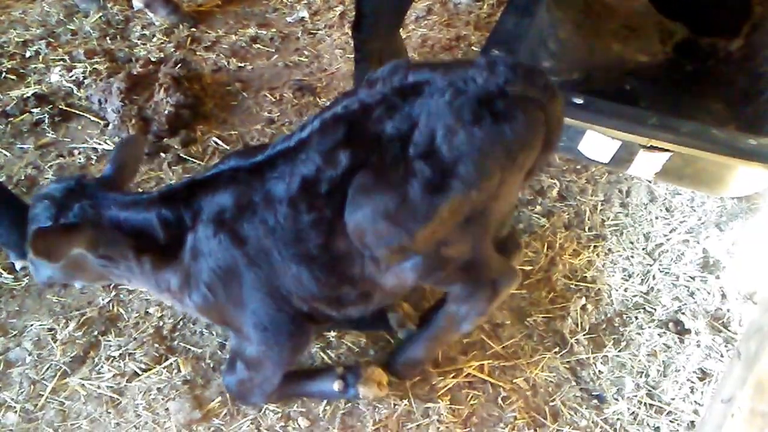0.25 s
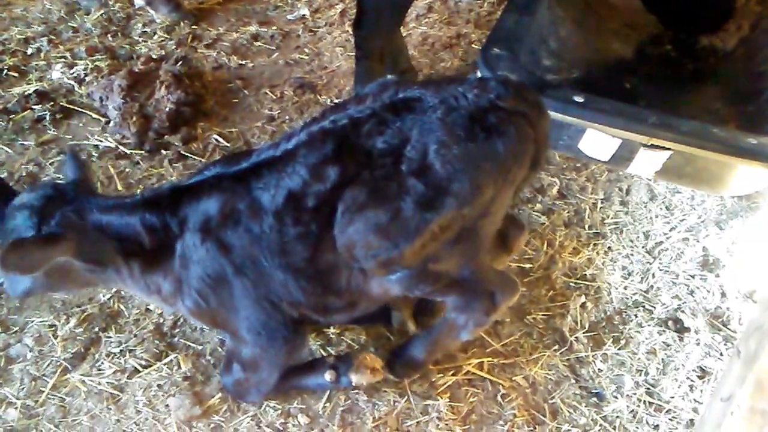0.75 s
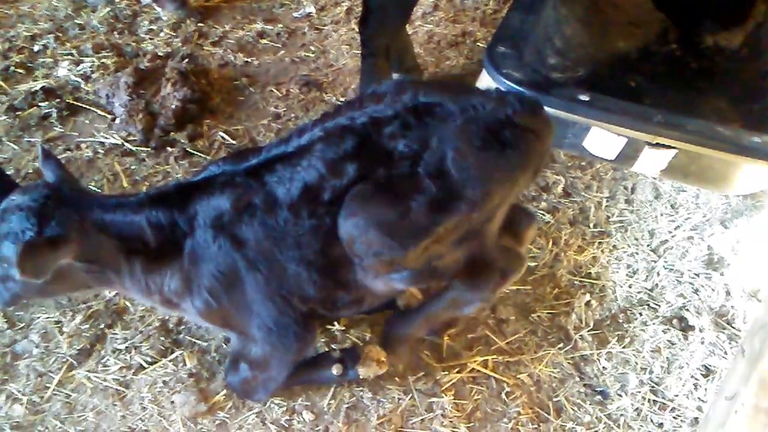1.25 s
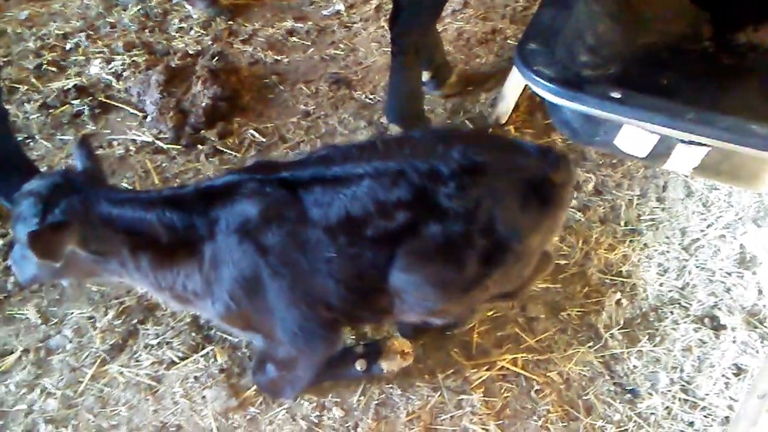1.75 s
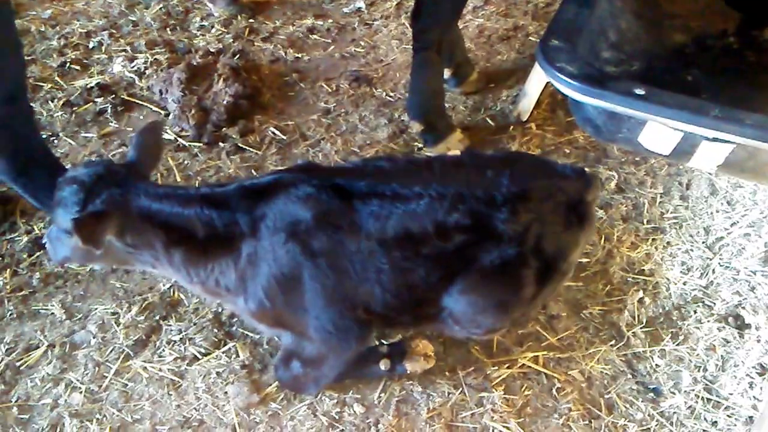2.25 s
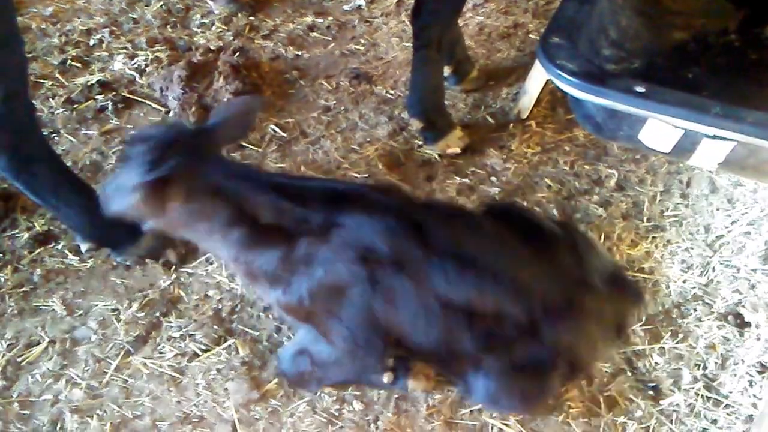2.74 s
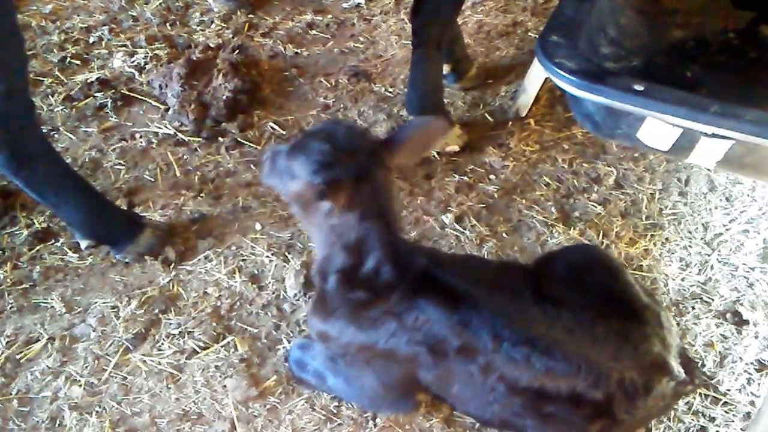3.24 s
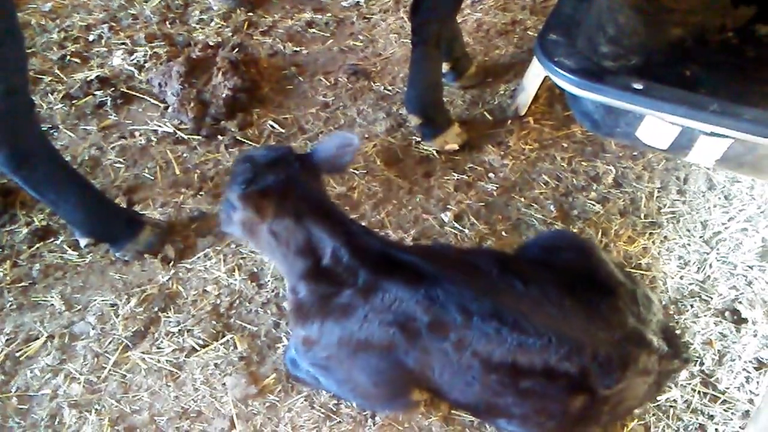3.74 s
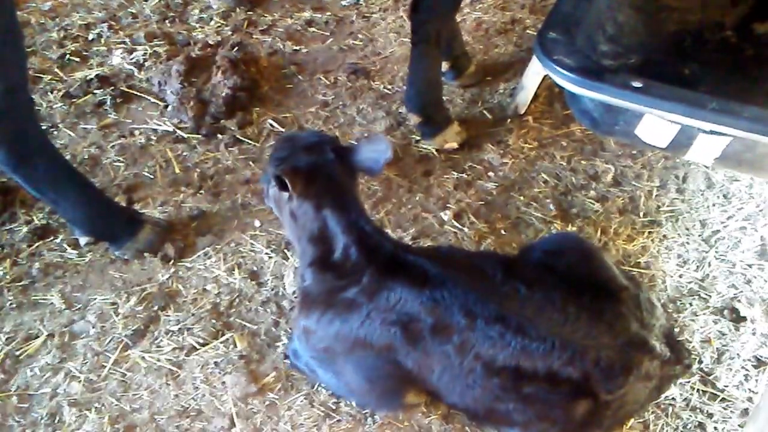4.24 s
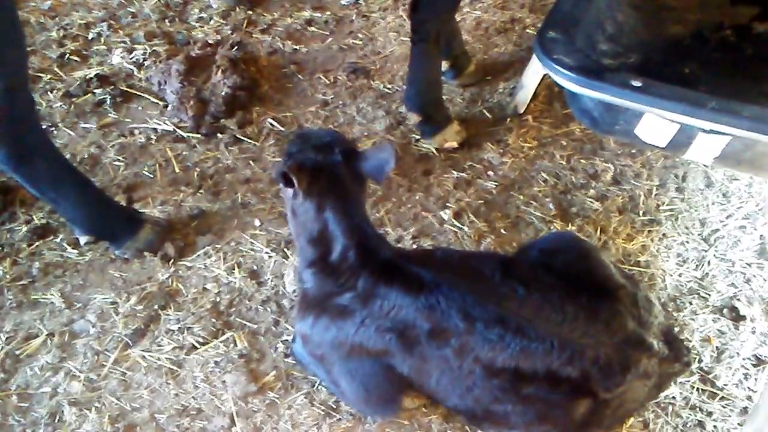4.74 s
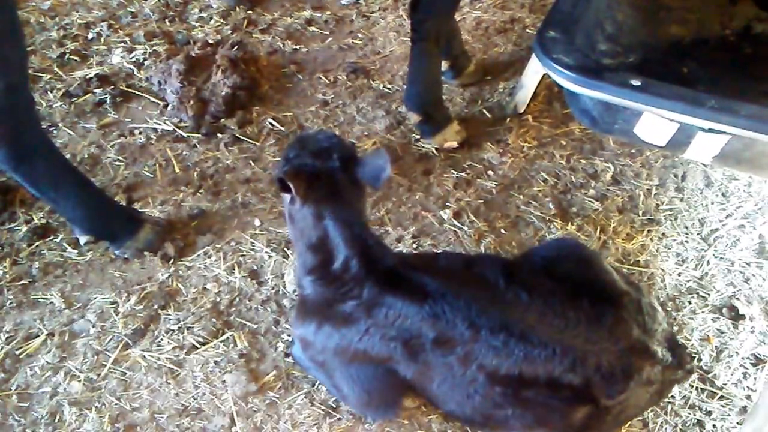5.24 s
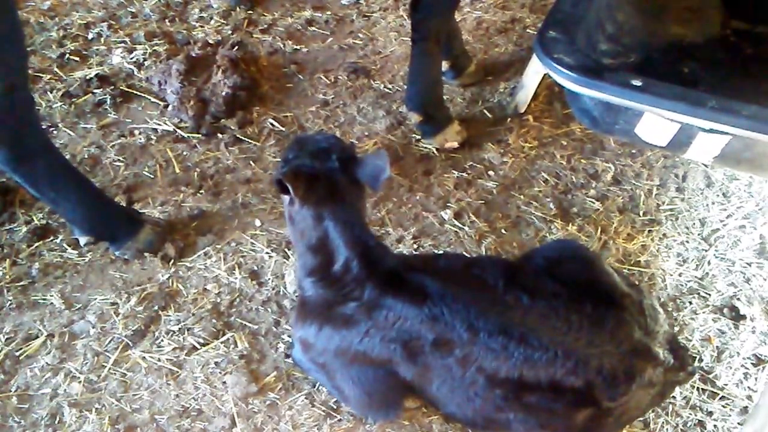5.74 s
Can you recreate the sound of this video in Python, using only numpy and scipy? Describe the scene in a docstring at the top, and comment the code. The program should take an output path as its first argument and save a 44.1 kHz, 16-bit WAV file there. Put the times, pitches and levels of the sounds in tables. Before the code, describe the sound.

A close single-channel view of cattle in a straw-bedded barn, with a short, soft room tail. From 0.15 seconds, hollow knocks and gritty scraping come from a plastic feed tub, with a firmer double knock at 0.6 and a few soft thuds until 0.8. Lighter scraping around 1.1 leads to a strong rasping burst with a stalk snap at 1.45. Knocks and rustles resume near 1.9, and a loud double knock with grinding lands at 2.35. More scraping and a thud follow around 2.75, then a sharp knock at 3.3. From 3.6 to 4.2 there is milder scraping and straw crackle. After a lull, loud hollow knocks hit at 4.7. Softer bumps follow at 5.1 to 5.3, then crisp, bright straw sweeps swell close from 5.7 to the end. Faint echoing bird whistles, quiet air and a deep drone lie far behind.

```python
"""Gritty scrapes and hollow knocks come in irregular bursts over soft thuds; dry straw crackles close by.
A cow beside a lying calf shoves feed in a plastic tub: clumped random grains pass through filters with tub modes.
Knocks are noise bursts ringing the tub, thuds are damped sines, straw is dense grains and single snaps.
Stalks hiss in narrow gliding bands and loud straw sweeps come at the end.
Faint echoing bird whistles, the hush of the barn and a deep drone lie behind."""
import sys
import numpy as np
from scipy import signal
from scipy.fft import rfft, irfft, next_fast_len
from scipy.io import wavfile
from scipy.ndimage import uniform_filter1d, map_coordinates

SR = 44100
rng = np.random.default_rng(int(sys.argv[2]) if len(sys.argv) > 2 else 0)


def digitize_waveform(pressure):
    """Quantize a signal to 16-bit integers and store it at the path in sys.argv[1].

    Rows of a 2-D input are taken as channels; values are limited to [-1, 1].
    """
    field = np.atleast_2d(pressure).T
    bounded = np.clip(field, -1, 1)
    quanta = np.round(bounded * 32767).astype(np.int16)
    wavfile.write(sys.argv[1], SR, quanta)


N = 263585  # samples

# Background air spectrum. Each row: frequency in Hz, relative density in dB per Hz.
AIR_SPECTRUM = [(20, -14), (45, -6), (70, 8.5), (240, -1.5), (400, -9), (680, -9), (900, -9), (1200, 1.5),
                (1500, -23.5), (2500, -13.5), (4500, -25), (7000, -17.5), (10400, -28.5), (15500, -19)]
AIR_RMS_DB = -66
# Swells of a deep drone. Each row: start of full level in s, attack in s, hold in s, level in dB.
DRONE_SWELLS = [(3.97, .35, 0.42, -62.5), (4.82, 0.38, 0.054, -60.5)]
DRONE_REST_DB, DRONE_FALL_DB_PER_S = -75, 50
# Far bird calls. Each row: start in s, length in s, start pitch in Hz, end pitch in Hz, direct peak in dB.
BIRD_CALLS = [(0.0, 0.21, 2700, 2500, -83), (0.673, .11, 3475, 3065, -73), (2.438, .16, 6350, 6250, -84.5),
              (4.84, .24, 3630, 3730, -87), (4.992, 0.65, 2540, 2305, -81), (4.97, .3, 6380, 5960, -85),
              (5.261, 0.19, 3030, 2930, -80), (5.4, .16, 3030, 2912, -74), (5.436, .12, 2600, 2400, -79)]
BIRD_WAVER_HZ = 150  # per unit of random wobble
# Barn reverberation. Each row: frequency in Hz, 60 dB decay time in s.
BARN_T60 = [(150, 0.54), (1000, 0.38), (3000, 0.49), (10000, 0.21)]

# Muzzle shoves. Each row: start of full force in s, attack in s, hold in s,
# hollow scrape in dB, gritty rasp in dB, body rumble in dB.
SHOVES = [(0.002, 0.029, 0.011, -57.5, -54.5, -58), (0.171, 0.029, 0.066, -39, -47.0, -46.5),
          (0.485, 0.099, 0.005, -50.0, -51, -51.0), (0.563, 0.043, 0.044, -49, -52, -58),
          (0.615, 0.053, 0.065, -44.5, -39.5, -43), (0.684, 0.053, 0.12, -46.5, -52, -47),
          (0.921, 0.097, 0.0043, -54.5, -54, -53.5), (1.043, 0.052, 0.035, -44.5, -44, -45.5),
          (1.15, 0.037, 0.017, -48.5, -53, -54.0), (1.253, 0.022, 0.005, -54.5, -57.5, -58.5),
          (1.443, 0.056, 0.034, -33, -32.5, -42.5), (1.563, 0.015, 0.0078, -48, -50.5, -51.5),
          (1.784, 0.048, 0.0073, -67, -80, -52.0), (1.919, 0.033, 0.041, -42.5, -43.5, -51.5),
          (2.194, 0.053, 0.005, -49.5, -52.5, -59.5), (2.275, 0.018, 0.054, -39.5, -56, -57),
          (2.362, 0.041, 0.031, -32, -33.5, -38), (2.662, 0.023, 0.046, -41, -42.0, -58),
          (2.783, 0.025, 0.026, -39.5, -40.5, -45.0), (3.154, 0.06, 0.082, -45, -49.0, -53.5),
          (3.282, 0.041, 0.0027, -34, -33.5, -53), (3.366, 0.008, 0.006, -48.0, -58, -53.5),
          (3.675, 0.086, 0.0056, -43.5, -47, -55.5), (3.727, 0.025, 0.081, -46.5, -50.5, -62.5),
          (3.898, 0.028, 0.069, -51, -53, -63.5), (4.037, 0.065, 0.005, -52, -55, -62.5),
          (4.171, 0.054, 0.062, -41.5, -53.5, -47), (4.676, 0.027, 0.058, -43, -44, -61.5),
          (4.739, 0.008, 0.012, -36.5, -39.5, -42.5), (5.103, 0.096, 0.005, -49, -54, -66.5),
          (5.295, 0.029, 0.074, -49, -75, -51)]
SCRAPE_FALL_DB_PER_S, RASP_FALL_DB_PER_S, RUMBLE_FALL_DB_PER_S = 174.5, 225, 160
SAG_DB_PER_S = 11  # during the hold of every stroke
# Restless light crackle, interpolated. Each row: time in s, level in dB before flutter.
STIRRING = [(0.0, -68.5), (0.7, -64.5), (1.3, -57), (1.75, -61), (2.6, -61.5), (3.5, -58.5), (4.3, -61.5),
            (4.6, -71.5), (5.0, -74), (5.98, -83)]
STIRRING_FLUTTER_DB, STIRRING_FLUTTER_PER_S = 2.5, 16  # dB per unit of wobble, knots per s
LOOSE_FEED_DB, LOOSE_GRIT_DB = -8, -10  # scrape and rasp relative to STIRRING
# Tub resonances. Each row: frequency in Hz, width in Hz, lift over the broad response in dB.
TUB_MODES = [(323, 14, 4), (525.5, 22, 3.5), (584, 15, 2), (742, 19, 6), (891, 69, 3), (1018, 21, 3),
             (1168, 26, 6), (1235, 18, 2.5), (1388, 13, 2.5), (1571, 63, 7.5), (1837, 15, 0.5),
             (2009, 16, 4), (2050, 20, 1.5), (2370, 47, 3), (2825, 29, -4)]
# Broad spectra of the tub and body sounds. Each row: frequency in Hz, relative density in dB per Hz.
SCRAPE_SPECTRUM = [(150, -38.5), (330, -21.5), (520, -21.5), (690, -23.5), (830, -0.5), (1020, 0.5),
                   (1250, -1), (1450, -13), (1900, -12), (3500, -47.5), (8000, -70.5)]
RASP_SPECTRUM = [(700, -23.5), (1300, -19.5), (1650, 8), (2300, 2.5), (2950, 3.5), (3400, -5.5),
                 (4000, -16.5), (5500, -20.5), (9000, -47)]
HOLLOW_SPECTRUM = [(100, -47), (250, -17.5), (450, 15.5), (720, 11), (900, -15), (1600, -37), (5000, -64)]
RUMBLE_SPECTRUM = [(30, -47.5), (70, -17.5), (130, -7.5), (220, 0), (320, -2), (420, -11), (650, -11.5),
                   (1200, -55)]

# Legs and flanks stirring straw. Each row: start of full force in s, attack in s, hold in s, crackle in dB.
RUSTLES = [(0.155, 0.02, 0.083, -53.5), (0.47, 0.153, 0.13, -58.5), (0.607, 0.036, 0.051, -48.5),
           (0.905, 0.006, 0.012, -58), (1.04, 0.046, 0.15, -49.5), (1.427, 0.065, 0.03, -42),
           (1.878, 0.23, 0.061, -55), (2.066, 0.077, 0.0046, -52.5), (2.313, 0.058, 0.083, -47.5),
           (2.692, 0.11, 0.14, -52.5), (3.22, 0.12, 0.058, -47), (3.556, 0.054, 0.005, -54),
           (3.631, 0.028, 0.17, -49.5), (3.895, 0.079, 0.087, -47.0), (4.112, 0.02, 0.18, -50),
           (4.669, 0.051, 0.087, -52), (5.086, 0.098, 0.005, -55), (5.193, 0.036, 0.008, -48),
           (5.359, 0.085, 0.005, -48.5), (5.619, 0.054, 0.086, -58), (5.729, 0.022, 0.012, -43.5),
           (5.876, 0.016, 0.11, -40.0)]
RUSTLE_FALL_DB_PER_S = 210
# Close sweeps through straw. Each row: start of full force in s, attack in s, hold in s, level in dB.
SWEEPS = [(5.739, 0.031, 0.032, -47.5), (5.781, 0.057, 0.01, -37.5), (5.836, 0.023, 0.035, -42.5)]
SWEEP_FALL_DB_PER_S = 440
# Straw spectra. Each row: frequency in Hz, relative density in dB per Hz.
CRACKLE_SPECTRUM = [(1500, -14), (3500, -17.5), (5000, -18), (6800, -11.5), (8000, -4), (8900, -7.5),
                    (9900, 2.5), (10600, 3.5), (11800, -3), (13500, -10), (16000, -14.5)]
SWEEP_SPECTRUM = [(1500, -36), (3000, 1), (4300, -0.5), (6500, -3.5), (9000, 3.5), (14000, 0.5),
                  (16000, -10)]

# Knocks on the tub. Each row: start in s, peak before the barn tail in dB,
# hollow part in dB before a 0.5 dB cut, hard edge in dB (both beside a scrape part at -3 dB).
KNOCKS = [(0.153, -35, -15, -1), (0.17, -27, -4.5, -7), (0.431, -36.5, -14, -4), (0.473, -28, -27, 17),
          (0.62, -21, -10, 1), (0.641, -26.5, -9.5, -14), (1.085, -29.5, -9, -28), (1.409, -27, -18, 19),
          (1.467, -23.5, -41, -13), (1.781, -43.5, -28, -16.5), (1.915, -26, -35, 6.5),
          (2.187, -41, -12, -4), (2.269, -23, -7.5, -27), (2.353, -15.5, -13.5, -8), (2.378, -19, -8, -7),
          (2.647, -42, -26, 13), (2.722, -30, -14.5, -9.5), (3.128, -38, -14, -10),
          (3.165, -23, -10.5, -12), (3.285, -16, -44, -13), (3.288, -23, -42, 2.5), (3.648, -26, -23, -5),
          (3.821, -25, -38, -10), (4.664, -33.5, -28, 5), (4.679, -26.5, -9, -11), (4.709, -22.5, 0.5, 3),
          (4.74, -14.5, -18, -21), (5.092, -37, -16, -15), (5.278, -42, -25, -12)]
# Thuds of hooves and bodies. Each row: start in s, peak before the barn tail in dB, pitch in Hz.
THUDS = [(0.172, -33, 179), (0.6, -37.5, 342), (0.699, -35, 332), (0.75, -30.5, 358), (0.79, -38.5, 364),
         (1.548, -37, 208), (2.746, -29.5, 219), (4.213, -35, 190), (5.298, -30, 252)]
# Stalks snapping. Each row: start in s, peak before the barn tail in dB, pitch in Hz, resonance in dB.
SNAPS = [(0.474, -29.5, 5040, 13), (1.455, -23.5, 5940, 15), (1.88, -37.5, 8000, -2),
         (1.997, -32.5, 5860, 19), (2.186, -26, 6130, 11), (2.877, -33.5, 7960, 11), (3.788, -36, 7900, 17),
         (4.441, -35, 14500, 18), (4.709, -32.5, 5160, 25), (5.192, -31.5, 8200, -1), (5.729, -27, 6030, 4),
         (5.791, -25.5, 6500, -3), (5.899, -37, 8000, -8)]
SMALL_SNAP_DB, SMALL_SNAP_SPREAD_DB, SMALL_SNAP_HZ, SMALL_SNAP_RING_DB = -46.5, 3, 8000, 3
# Stalks sliding along a coat. Each row: start in s, length in s, start centre in Hz, end centre in Hz,
# width relative to the start centre, rms before the fade in dB.
SLIDES = [(1.04, 0.33, 10800, 10500, 0.07, -48.5), (5.818, 0.042, 5000, 7400, 0.18, -44),
          (5.81, 0.185, 1900, 1850, 0.1, -44), (5.8, 0.224, 2640, 2800, 0.091, -46),
          (5.76, 0.264, 1140, 1100, .11, -47.5)]
SLIDE_ROUGH_DB, SLIDE_SKIRT_DB = 3, -8  # flutter per unit of wobble; broader hiss around the band

TOP_HZ = 15850


def amp(db):
    """Decibels to gain."""
    return 10 ** (np.asarray(db) / 20)


def unit(x):
    """Scale to rms 1."""
    return x / np.sqrt(np.mean(x ** 2) + 1e-20)


def along(points, hz):
    """Read (Hz, value) points on a log frequency axis."""
    f, v = np.transpose(points)
    return np.interp(np.log(hz + 1), np.log(f + 1), v)


def curves(rows):
    """One value per sample for each column after the time."""
    s, *cols = np.transpose(rows)
    return [np.interp(np.arange(N) / SR, s, c) for c in cols]


def wobble(rate, size=N):
    """Smooth random curve with rate knots per second."""
    knots = rng.standard_normal(int(size * rate / SR) + 4)
    return map_coordinates(knots, [np.arange(size) * rate / SR])


def add(track, s, sound):
    """Mix a sound into the track from s seconds, clipped to its ends."""
    start = round(s * SR)
    part = sound[max(-start, 0):N - start]
    track[max(start, 0):][:len(part)] += part


def colour(x, spectrum, modes=(), size=8192):
    """Minimum-phase filter: a broad spectrum plus narrow ringing modes."""
    hz = np.fft.rfftfreq(size, 1 / SR)
    lifts_db = sum(lift / (1 + (2 * (hz - f) / width) ** 2) for f, width, lift in modes)
    db = along(spectrum, hz) + lifts_db
    cepstrum = irfft(np.log(amp(db)))
    # Folding the cepstrum makes the filter causal.
    cepstrum[1:size // 2] *= 2
    cepstrum[size // 2 + 1:] = 0
    impulse = irfft(np.exp(rfft(cepstrum)))
    return signal.fftconvolve(x, impulse)[:len(x)]


def barn(x, wet_db):
    """Add a diffuse noise tail that builds up, then decays at a rate set by frequency."""
    hz, t, z = signal.stft(rng.standard_normal(SR // 2), SR, nperseg=256)
    decay = amp(-60 * t / along(BARN_T60, hz)[:, None])
    build_up = 1 - np.exp(-t / 0.0058)
    tail = signal.istft(z * decay * build_up, SR, nperseg=256)[1]
    return x + amp(wet_db) * signal.fftconvolve(x, tail / np.linalg.norm(tail))[:len(x)]


def grains(rate, spread_db, clump_db, clump_rate):
    """Random fractures, rate per second, of uneven size and sign, whose size swells in clumps."""
    struck = rng.random(N) < rate / SR
    sizes = amp(spread_db * np.clip(rng.standard_normal(N), -2, 2)) * rng.choice([-1, 1], N)
    return struck * sizes * amp(clump_db * np.tanh(wobble(clump_rate)))


def walls(x, strength=.33, spread=.012, count=7):
    """Quick echoes, as off the tub's sides and the ground, with random delays and signs."""
    out = x.copy()
    for late, gain in zip(rng.uniform(.001, spread, count), rng.choice([-1, 1], count)):
        lag = max(1, round(late * SR))
        out[lag:] += gain * strength * np.exp(-late / spread) * x[:-lag]
    return out


def wandering(x, hop_s=.09):
    """The point of contact moves: overlapping windows each get a new pattern of quick echoes."""
    out, size = np.zeros(N), int(hop_s * SR)
    padded, window = np.pad(x, (size, 2 * size)), np.hanning(2 * size)
    for start in range(-size, N, size):
        piece = padded[start + size:start + 3 * size] * window
        add(out, start / SR, walls(piece, strength=0.45, spread=.009))
    return out


def even(x, span_s=0.069):
    """Hold the short-term rms near 1, leaving only the fine grain."""
    span = int(span_s * SR)
    power = abs(uniform_filter1d(uniform_filter1d(unit(x) ** 2, span), span))
    return unit(x) / np.sqrt(power + 0.011)


def strokes(rows, fall_db_per_s):
    """Gain of strokes that each rise 20 dB over the attack, sag in the hold, then fall."""
    t = np.arange(0, N, 32) / SR
    s, attack, hold, db = np.transpose(rows)[:, :, None]
    attack, hold = np.maximum(attack, 0) + 1 / SR, np.maximum(hold, 0)
    rise_db = 20 * np.maximum(s - t, 0) / attack
    sag_db = SAG_DB_PER_S * np.clip(t - s, 0, hold)
    fall_db = fall_db_per_s * np.maximum(t - s - hold, 0)
    gain = np.linalg.norm(amp(db - rise_db - sag_db - fall_db), axis=0)  # powers add
    return np.interp(np.arange(N) / SR, t, gain)


def shoving(column, fall_db_per_s):
    """Gain of one layer of the shoves; layers share start, attack and hold."""
    rows = [(s, attack, hold, levels[column]) for s, attack, hold, *levels in SHOVES]
    return strokes(rows, fall_db_per_s)


def air():
    """Steady filtered-noise hush of the barn and a swelling deep drone from outside."""
    hush = unit(colour(rng.standard_normal(N), AIR_SPECTRUM))
    swell = np.hypot(strokes(DRONE_SWELLS, DRONE_FALL_DB_PER_S), amp(DRONE_REST_DB))
    drone_spectrum = [(35, -33.5), (66, 0.5), (95, -0.5), (130, -1.5), (260, -26.5)]  # Hz, dB per Hz
    drone = unit(colour(rng.standard_normal(N), drone_spectrum))
    return amp(AIR_RMS_DB) * hush + swell * drone


def birds():
    """Gliding sines with rough random waver, far off and heard mostly as echo."""
    out = np.zeros(N)
    for s, length, start_hz, end_hz, db in BIRD_CALLS:
        u = np.linspace(0, 1, int(length * SR))
        hz = start_hz + (end_hz - start_hz) * u + BIRD_WAVER_HZ * wobble(500, len(u))
        whistle = np.sin(2 * np.pi * np.cumsum(hz) / SR)
        add(out, s, amp(db) * np.sin(np.pi * u) * whistle)
    return barn(out, wet_db=18.5)


def feeding():
    """Feed grinds over plastic with each shove: coarse slips ring the tub, fine grit rasps."""
    stir_db, = curves(STIRRING)
    slips = grains(rate=500, spread_db=4, clump_db=2, clump_rate=69)
    grit = unit(slips) + unit(grains(rate=710, spread_db=6, clump_db=6, clump_rate=70))
    scrape = even(colour(barn(wandering(slips), wet_db=-8.5), SCRAPE_SPECTRUM, TUB_MODES))
    rasp = even(colour(barn(wandering(grit), wet_db=-14), RASP_SPECTRUM, TUB_MODES))
    scrape_gain = np.hypot(shoving(0, SCRAPE_FALL_DB_PER_S), amp(stir_db + LOOSE_FEED_DB))
    rasp_gain = np.hypot(shoving(1, RASP_FALL_DB_PER_S), amp(stir_db + LOOSE_GRIT_DB))
    return scrape_gain * scrape + rasp_gain * rasp


def shifting():
    """The heavy body rubs and bumps with each shove: a dull, lumpy rumble through the tub modes."""
    bumps = grains(rate=400, spread_db=4.5, clump_db=2.5, clump_rate=40)
    rumble = even(colour(barn(bumps, wet_db=-8.5), RUMBLE_SPECTRUM, TUB_MODES))
    return shoving(2, RUMBLE_FALL_DB_PER_S) * rumble


def straw():
    """Dry stalks crackle as random fractures; the close sweeps are denser and broader."""
    stir_db, = curves(STIRRING)
    flutter_db = STIRRING_FLUTTER_DB * wobble(STIRRING_FLUTTER_PER_S)
    rustling = np.hypot(strokes(RUSTLES, RUSTLE_FALL_DB_PER_S), amp(stir_db + flutter_db))
    stalks = grains(rate=3000, spread_db=4, clump_db=5.0, clump_rate=130)
    crackle = even(colour(barn(stalks, wet_db=-2.5), CRACKLE_SPECTRUM))
    sweeping = strokes(SWEEPS, SWEEP_FALL_DB_PER_S)
    fibres = grains(rate=5000, spread_db=1.5, clump_db=2.5, clump_rate=200)
    return rustling * crackle + sweeping * even(colour(fibres, SWEEP_SPECTRUM))


def knocks():
    """A sharp contact and a brief noise chatter ring the tub and the barn."""
    out, t = np.zeros(N), np.arange(SR // 3) / SR
    for s, db, hollow_db, edge_db in KNOCKS:
        contact = rng.standard_normal(len(t)) * amp(-60 * t / 0.021)
        contact[0] += 8
        contact = walls(contact, strength=0.59, spread=.007)
        parts = [(SCRAPE_SPECTRUM, -3), (HOLLOW_SPECTRUM, hollow_db - 0.5), (RASP_SPECTRUM, edge_db)]
        ring = sum(amp(level) * unit(colour(contact, spectrum, TUB_MODES)) for spectrum, level in parts)
        add(out, s, barn(amp(db) * ring / abs(ring).max(), wet_db=-6.5))
    return out


def thuds():
    """Cushioned blows: short sines that swell and die smoothly."""
    out, t = np.zeros(N), np.arange(SR // 2) / SR
    for s, db, hz in THUDS:
        u = t / 0.0029
        push = u ** 2 * np.exp(-u) * np.sin(2 * np.pi * hz * t)
        add(out, s, barn(amp(db) * push / abs(push).max(), wet_db=-10))
    return out


def snaps(count=12):
    """A stalk clicks, then splinters around its own pitch; count lesser ones break at random."""
    out, t = np.zeros(N), np.arange(SR // 6) / SR
    small = []
    for when, size in rng.random((count, 2)):
        db = SMALL_SNAP_DB + SMALL_SNAP_SPREAD_DB * (2 * size - 1)
        small.append((when * N / SR, db, SMALL_SNAP_HZ, SMALL_SNAP_RING_DB))
    for s, db, hz, ring_db in SNAPS + small:
        splinter = rng.standard_normal(len(t)) * amp(-60 * t / 0.029)
        splinter[0] += 4
        snap = colour(splinter, CRACKLE_SPECTRUM, [(hz, 1300, ring_db)])
        add(out, s, barn(amp(db) * snap / abs(snap).max(), wet_db=-9.5))
    return out


def slides():
    """A sliding stalk sticks and slips: a fluttering narrow-band hiss with a gliding centre."""
    out = np.zeros(N)
    for s, length, start_hz, end_hz, width, db in SLIDES:
        u = np.linspace(0, 1, int(length * SR))
        phase = 2 * np.pi * np.cumsum(start_hz + (end_hz - start_hz) * u) / SR
        band = 2 * width * start_hz  # knots per s
        a, b = (wobble(band, len(u)) + amp(SLIDE_SKIRT_DB) * wobble(2.6 * band, len(u)) for _ in range(2))
        flutter = amp(SLIDE_ROUGH_DB * wobble(110.4, len(u)))
        hiss = unit((a * np.cos(phase) + b * np.sin(phase)) * flutter)
        add(out, s, amp(db) * np.sin(np.pi * u) * hiss)
    return out


def scene():
    """Sum of all sources, one channel."""
    background = air() + birds()
    cow = feeding() + shifting() + knocks()
    bedding = straw() + thuds() + snaps() + slides()
    return (background + cow + bedding)[None]


def record(dry):
    """Remove everything from TOP_HZ up."""
    m = next_fast_len(N + SR // 2)
    passed = np.fft.rfftfreq(m, 1 / SR) < TOP_HZ
    return irfft(rfft(dry, m) * passed, m)[..., :N]


dry = scene()
out = record(dry)
digitize_waveform(out)
```